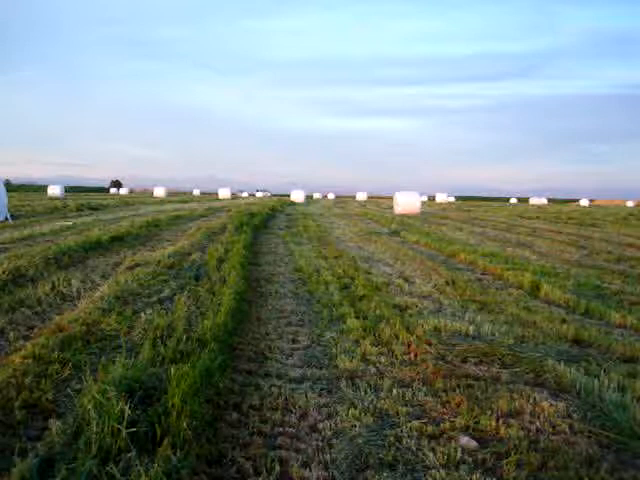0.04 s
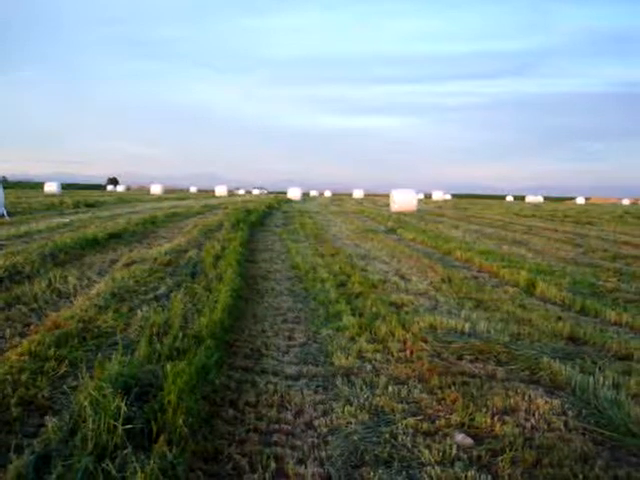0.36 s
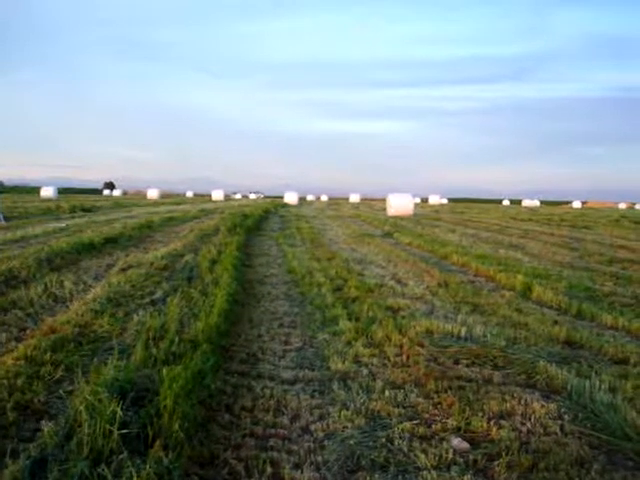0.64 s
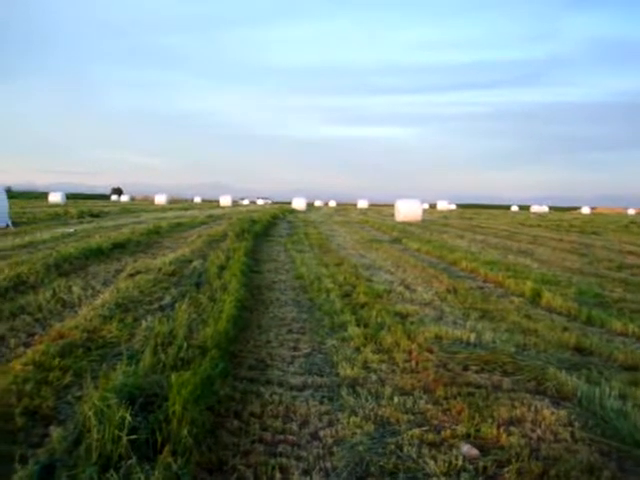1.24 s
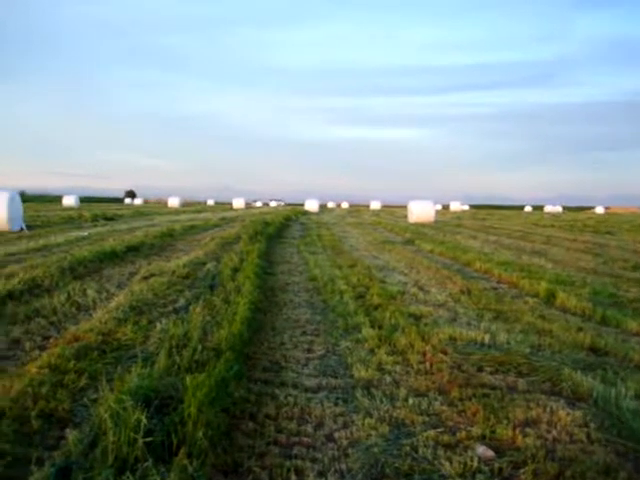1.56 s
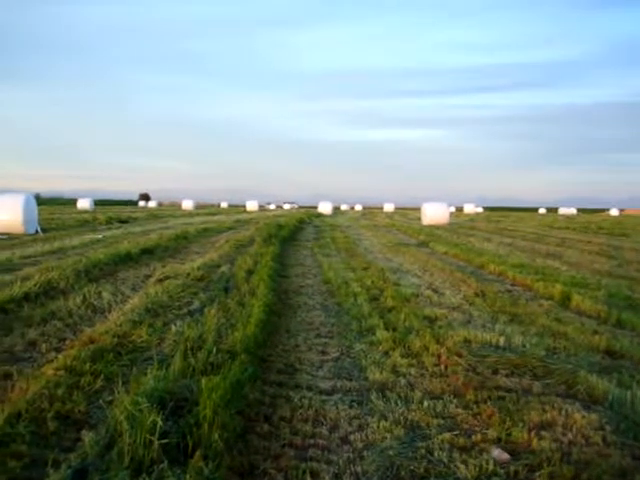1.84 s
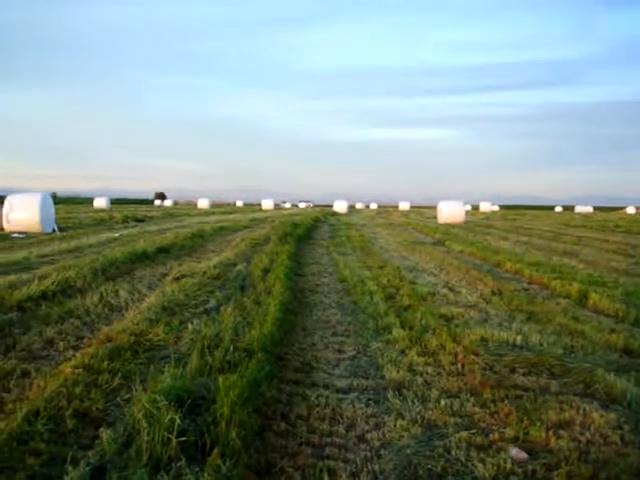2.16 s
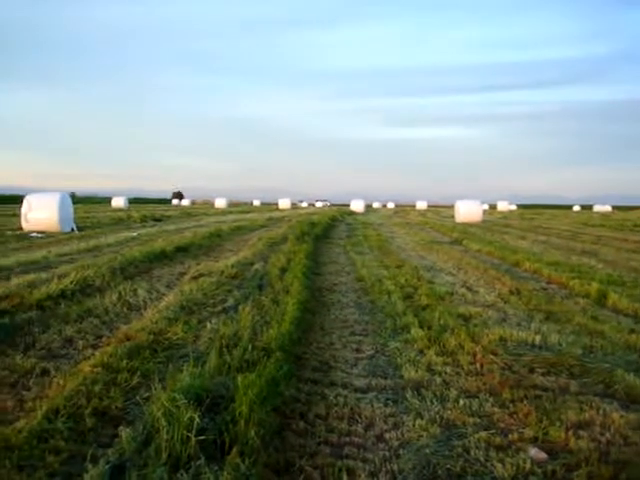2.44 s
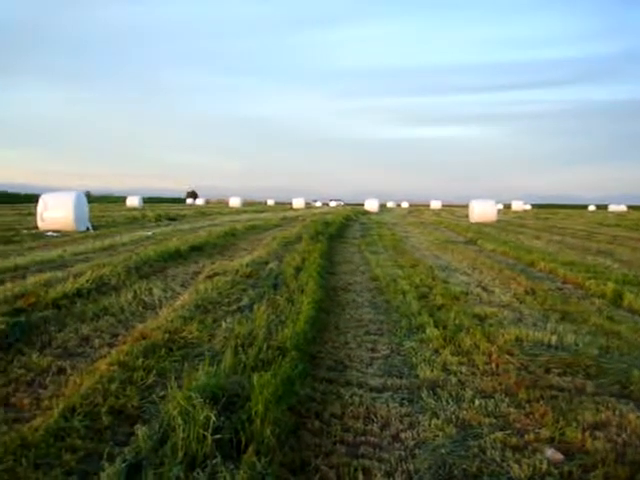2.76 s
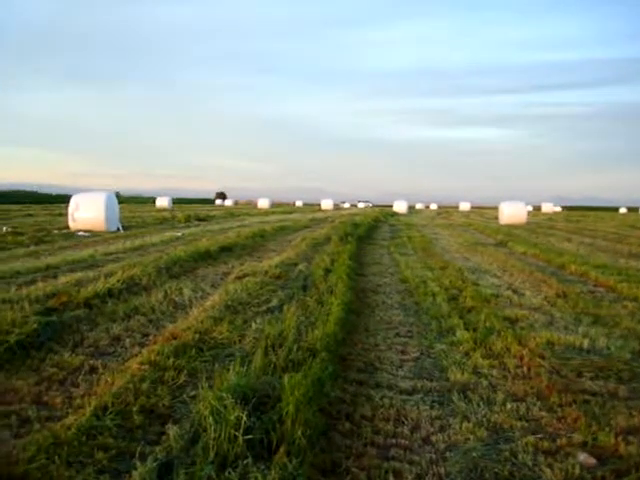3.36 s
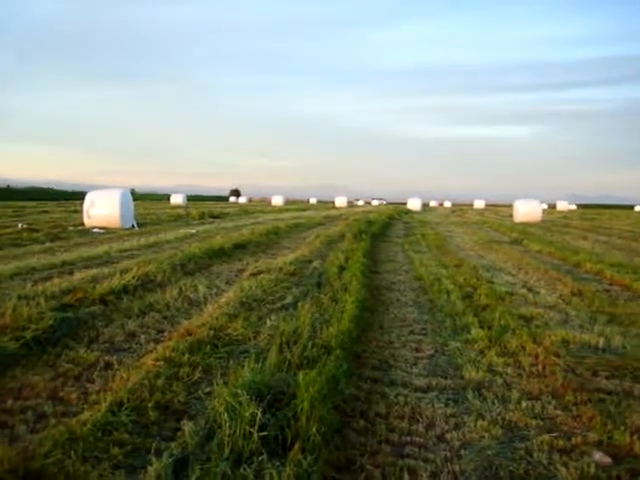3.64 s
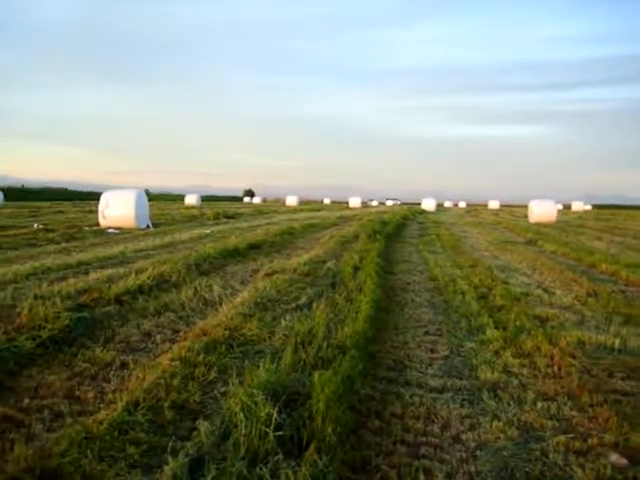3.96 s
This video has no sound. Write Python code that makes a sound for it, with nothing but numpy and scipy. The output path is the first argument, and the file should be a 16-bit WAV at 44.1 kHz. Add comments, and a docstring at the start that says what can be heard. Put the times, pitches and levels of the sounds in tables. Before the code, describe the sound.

Songbirds sing across an open field, one whistling slurred notes from 0.8 seconds to the end. From 1.2 to 2.3 seconds another adds high chips and buzzes ending in a trill, while distant birds pipe faintly. Close by, a small camera motor ticks and whirrs for the first two seconds, with handling bumps and clicks; more clicks come around 3.5 seconds. Soft wind hiss and faint hum lie underneath.

```python
"""An open hay field: soft wind hiss, a low hum and a thin electronic whine lie under everything.
For the first two seconds a small camera motor ticks, whines and whirrs close by; the housing clicks
and bumps in the hand. From 0.8 s a songbird whistles slurred notes. From 1.2 to 2.3 s another sings
a high phrase of chips and buzzes ending in a trill, and far birds begin to pipe. A faint drone swells,
the housing clicks again around 3.5 s, and a far bird hoots at the end."""
import sys
import numpy as np
from scipy import signal
from scipy.fft import rfft, irfft, next_fast_len
from scipy.io import wavfile
from scipy.ndimage import uniform_filter1d, map_coordinates

SR = 44100
rng = np.random.default_rng(int(sys.argv[2]) if len(sys.argv) > 2 else 0)


def output_pcm(signal):
    """Save a mono or channel-first signal as 16-bit PCM at the path in sys.argv[1].

    Samples are clipped to [-1, 1] before scaling.
    """
    pcm = np.clip(np.atleast_2d(signal).T, -1, 1) * 32767
    wavfile.write(sys.argv[1], SR, np.round(pcm).astype(np.int16))


N = 176400


def amp(db):
    """Decibels to gain."""
    return 10 ** (np.asarray(db) / 20)


def clock(length_s):
    """Sample times of a short sound."""
    return np.arange(max(int(length_s * SR), 8)) / SR


def decay(t, t60_s):
    """Exponential fall, 60 dB in t60_s."""
    return np.exp(-np.log(1000) * t / t60_s)


def curve(rows):
    """(time [s], value) rows as one value per sample."""
    return np.interp(np.arange(N) / SR, *np.transpose(rows))


def wobble(rate_hz, size=N):
    """Smooth random curve, rate_hz knots a second."""
    return map_coordinates(rng.standard_normal(2048), [np.arange(size) * rate_hz / SR], mode="wrap")


def noise(colour):
    """Noise of rms 1, shaped by (frequency [Hz], gain [dB]) rows."""
    hz, db = np.transpose(colour)
    gain = amp(np.interp(np.log(np.fft.rfftfreq(N, 1 / SR) + 1), np.log(hz + 1), db))
    shaped = irfft(rfft(rng.standard_normal(N)) * gain, N)
    return shaped / np.sqrt(np.mean(shaped ** 2) + 1e-20)


def add(out, start_s, sound):
    """Mix a sound in at start_s."""
    i = min(max(round(start_s * SR), 0), N)
    out[i:i + len(sound)] += sound[:N - i]


def tone(hz, rms_db, edge_s=0.0013):
    """Sine on a pitch track, with soft ends."""
    t = np.arange(len(hz)) / SR
    fade = np.sin(np.pi / 2 * np.clip(np.minimum(t, t[-1] - t) / edge_s, 0, 1))
    return np.sqrt(2) * amp(rms_db) * fade * np.sin(2 * np.pi * np.cumsum(hz) / SR)


def bursts(events, colour, rise_s, t60_s):
    """One dying puff of coloured noise per (time [s], level [dB]) event."""
    t, envelope = clock(.2), np.zeros(N)
    shape = (1 - np.exp(-t / rise_s)) * decay(t, t60_s)
    for start_s, db in events:
        add(envelope, start_s, amp(db) * shape / shape.max())
    return envelope * noise(colour)


def ring(modes, db, rise_s=0.00041):
    """Damped modes struck once, with random phase and slight level scatter."""
    t, sound = clock(.1), 0
    for hz, gain_db, t60_s in modes:
        envelope = amp(db + gain_db + rng.normal(0, 1)) * decay(t, t60_s)
        sound += envelope * np.sin(2 * np.pi * (hz * t + rng.random()))
    return sound * (1 - np.exp(-t / rise_s))


# wind and microphone floor spectrum (frequency [Hz], gain [dB])
WIND_COLOUR = [(15, -27), (25, -13), (45, -4.5), (80, 0), (200, -4.5), (380, -5), (630, -3), (815, -9),
               (1000, -7), (1450, -13), (2200, -13.5), (3500, -16.5), (5000, -17.5), (6500, -18),
               (7300, -17), (8300, -17), (10000, -27.5)]
def wind(level_db=-53):
    """Soft, slightly fluttering hiss of wind and microphone floor."""
    return amp(level_db + wobble(12)) * noise(WIND_COLOUR)


# hum lines (frequency [Hz], level [dB], unsteadiness [dB])
HUM_LINES = [(60.4, -61, 0.4), (90.8, -66, 0.5), (120.2, -66.5, 0.5)]
# whine lines (frequency [Hz])
WHINE_HZ = [7854, 7882, 8122]
# whine lines (level [dB])
WHINE_DB = [-72.5, -70, -68.5]
def electronics():
    """The camera's low hum and thin whine: slightly unsteady sines."""
    hum = sum(tone(hz + 0.65 * wobble(7.95), db + shake_db * wobble(14))
              for hz, db, shake_db in HUM_LINES)
    whine = sum(tone(hz + 2 * wobble(8), db + wobble(9.2)) for hz, db in zip(WHINE_HZ, WHINE_DB))
    return hum + whine


# drone envelope (time [s], level [dB])
DRONE_ENVELOPE = [(0, -74), (2.0, -77), (2.3, -59), (2.6, -63), (2.85, -73), (3.3, -67), (4, -66)]
def drone(hz=623.7):
    """One faint, wavering tone far away."""
    return tone(hz + 5 * wobble(20), curve(DRONE_ENVELOPE) + 2 * wobble(12))


# piped notes (start [s], length [s], pitch [Hz], end pitch [Hz], level [dB])
PIPE_NOTES = [(1.273, 0.13, 1487, 1430, -63.5), (1.473, 0.038, 3270, 2980, -58),
              (2.4, 0.051, 5060, 4900, -55.5), (2.502, 0.05, 5080, 5020, -57),
              (2.577, 0.092, 5270, 5300, -64), (2.725, .03, 5100, 5000, -63.5),
              (3.043, 0.031, 5050, 4950, -61), (3.756, .04, 3610, 3600, -64)]
# low hoots (start [s], length [s], pitch [Hz], level [dB])
HOOT_NOTES = [(3.94, .08, 550, -53), (3.93, .09, 590, -67)]
def far_birds(edge_s=0.01):
    """Faint fluttering notes of nearly level pitch."""
    out = np.zeros(N)
    for start_s, length_s, hz, end_hz, db in PIPE_NOTES:
        size = len(clock(length_s))
        pitch_hz = np.linspace(hz, end_hz, size) * (1 + 0.013 * wobble(400, size))
        add(out, start_s, tone(pitch_hz, db + 3 * wobble(150, size), edge_s))
    for start_s, length_s, hz, db in HOOT_NOTES:
        pitch_hz = hz * (1 + 0.031 * wobble(101, len(clock(length_s))))
        add(out, start_s, tone(pitch_hz, db, edge_s))
    return out


# hand bumps (time [s], level [dB])
BUMP_HITS = [(0.1228, -37.5), (0.136, -51), (.162, -42), (1.197, -45), (1.208, -37.5), (3.529, -48)]
# camera body modes (frequency [Hz], gain [dB], t60 [s])
BODY_MODES = [(264, -4.5, 0.082), (347, 0, 0.068), (451, -2, 0.028)]
# scuff spectrum (frequency [Hz], gain [dB])
SCUFF_COLOUR = [(60, -25), (200, -13), (310, -4.5), (430, 4), (700, -9.5), (1200, -11), (3000, -19),
                (9000, -33.5)]
def hand_bumps(scuff_db=-4.5):
    """The hand thuds on the camera body: dull modes and a scuff."""
    out = np.zeros(N)
    for start_s, db in BUMP_HITS:
        add(out, start_s, ring(BODY_MODES, db))
    return out + amp(scuff_db) * bursts(BUMP_HITS, SCUFF_COLOUR, rise_s=.0006, t60_s=0.04)


# clicks (time [s], noise level [dB], ring level [dB], favoured frequency [Hz])
CLICK_HITS = [(0.2568, -30, -32.5, 3050), (0.4922, -48.5, -44, 2200), (0.5103, -43, -46.5, 2200),
              (1.345, -44.5, -49, 3000), (2.061, -34.5, -38.5, 1620), (3.4455, -36.5, -40.5, 2280),
              (3.462, -51, -52, 4370), (3.477, -60, -50, 3000), (3.497, -34.5, -39, 2280),
              (3.5123, -40, -39.5, 2280), (3.528, -44.5, -48, 4400), (3.544, -47, -52, 4400),
              (3.562, -34.5, -41, 1250)]
# contact noise spectrum (frequency [Hz], gain [dB])
CONTACT_COLOUR = [(200, -9), (700, -1.5), (1300, 2.5), (3000, -1), (4800, -2), (6500, -1), (8500, -5),
                  (10000, -24.5)]
# housing modes (frequency [Hz], gain [dB], t60 [s])
HOUSING_MODES = [(1250, -12, .016), (1637, -5.5, 0.026), (2147, -0.5, 0.026), (2370, -1.5, 0.019),
                 (3010, -0.5, .012), (3970, -2.5, 0.026), (4480, 1.5, 0.015)]
def housing_clicks(boost_db=6.5, width_octaves=0.14):
    """Sharp clicks ring the plastic housing; each contact point favours modes near one frequency."""
    out = bursts([row[:2] for row in CLICK_HITS], CONTACT_COLOUR, rise_s=0.00052, t60_s=0.017)
    hz, gain_db, t60_s = np.transpose(HOUSING_MODES)
    for start_s, _, ring_db, favoured_hz in CLICK_HITS:
        nearness = np.exp(-(np.log2(hz / favoured_hz) / width_octaves) ** 2)
        add(out, start_s, ring(zip(hz, gain_db + boost_db * nearness, t60_s), ring_db))
    return out


# whirr envelope (time [s], level [dB])
WHIRR_ENVELOPE = [(.08, -50), (.3, -54.5), (.5, -55), (.72, -50.5), (.82, -57.5), (1.1, -51.5), (1.3, -57),
                  (1.45, -59), (1.65, -50.5), (1.8, -64.5), (2.0, -54.5), (2.12, -69.5), (2.3, -92.5)]
# whirr spectrum (frequency [Hz], gain [dB])
WHIRR_SPECTRUM = [(100, -5), (350, 6), (1000, 2.5), (1450, 0.5), (2150, 3), (2800, -2.5), (3600, -3),
                  (4500, -5.5), (6000, -13.5), (7800, -8.5), (9000, -15), (10000, -17)]
# hiss envelope (time [s], level [dB])
HISS_ENVELOPE = [(.08, -85), (.46, -52.5), (.52, -49.5), (.59, -51), (.66, -47), (.72, -46), (.76, -57),
                 (.95, -79), (1.12, -52), (1.3, -67), (1.45, -59), (1.56, -51), (1.63, -46), (1.69, -46.5),
                 (1.72, -72), (2.1, -75)]
# hiss spectrum (frequency [Hz], gain [dB])
HISS_SPECTRUM = [(1000, -21.5), (3500, -23), (4800, -3.5), (5400, -8), (6400, -3), (7200, 5), (8300, -0.5),
                 (9200, -2), (10000, -10.5)]
# motor whines (start [s], length [s], pitch [Hz], level [dB])
MOTOR_WHINES = [(0.179, 0.028, 3350, -56.5), (0.219, 0.023, 2360, -54), (0.256, .02, 4320, -45.5),
                (0.38, 0.046, 3840, -62), (0.397, 0.023, 2410, -54), (0.433, .04, 2390, -54),
                (0.737, 0.039, 3370, -60), (0.78, .02, 4340, -50.5), (0.792, 0.084, 3830, -56.5),
                (0.878, 0.051, 2404, -54), (1.146, 0.046, 2390, -54), (1.21, .04, 3850, -57),
                (1.241, .02, 4300, -52.5), (1.262, 0.019, 3850, -59), (1.975, 0.036, 2380, -52)]
def motor_whirr():
    """The running motor: broad whirr, swelling treble hiss and short steady whines."""
    whirr = amp(curve(WHIRR_ENVELOPE) + 1.2 * wobble(40)) * noise(WHIRR_SPECTRUM)
    hiss = amp(curve(HISS_ENVELOPE) + 1.9 * wobble(110)) * noise(HISS_SPECTRUM)
    whines = np.zeros(N)
    for start_s, length_s, hz, db in MOTOR_WHINES:
        add(whines, start_s, tone(np.full(len(clock(length_s)), hz), db, edge_s=0.0045))
    return whirr + hiss + whines


# tick envelope (time [s], level [dB])
TICK_ENVELOPE = [(.1, -41.5), (.22, -47.5), (.29, -43.5), (.41, -45), (.51, -41.5), (.55, -47), (.72, -42),
                 (.8, -45.5), (.92, -47.5), (1.03, -43), (1.12, -43.5), (1.24, -47.5), (1.345, -38.5),
                 (1.43, -42.5), (1.63, -46), (1.79, -41), (1.86, -46)]
# tick spectrum (frequency [Hz], gain [dB])
TICK_SPECTRUM = [(300, -32), (1500, -17), (2200, -5.5), (3300, -13.5), (4400, -6), (5150, -14), (5800, 1.5),
                 (6600, -5.5), (8500, -5.5), (10000, -19)]
# lens modes (frequency [Hz], gain [dB], t60 [s])
LENS_MODES = [(2120, -11.5, 0.017), (4390, -7, 0.016), (5000, -9.5, 0.015), (5790, -1, 0.013),
              (6200, -10.5, 0.0099)]
def motor_ticks(rate_hz=59.93, first_s=.0922, stop_s=1.85, ring_gain_db=6):
    """Each motor step makes a puff of noise and rings the lens."""
    times_s = np.arange(first_s, stop_s, 1 / rate_hz)
    levels_db = np.interp(times_s, *np.transpose(TICK_ENVELOPE)) + rng.normal(0, .5, len(times_s))
    out = bursts(zip(times_s, levels_db), TICK_SPECTRUM, rise_s=0.00073, t60_s=0.0064)
    for start_s, db in zip(times_s, levels_db):
        add(out, start_s, ring(LENS_MODES, db + ring_gain_db))
    return out


# buzzes (start [s], length [s], pitch [Hz], end pitch [Hz], level [dB],
#         warble rate [Hz], warble depth [Hz], swell [dB])
BUZZ_NOTES = [(0.079, 0.039, 5530, 5545, -43, 430, 260, 1), (1.447, 0.11, 5090, 5180, -46.5, 160, 180, 2.5),
              (1.551, 0.039, 5200, 5150, -43.5, 340, 110, -2), (1.599, .016, 7340, 7760, -48, 250, 150, -2),
              (1.62, 0.049, 5700, 5700, -50.5, 90, 250, -5), (1.687, 0.0083, 5740, 5600, -40, 300, 99, 0),
              (1.699, 0.033, 5570, 5620, -36, 430, 190, -3), (1.802, 0.032, 5680, 5800, -38, 370, 260, 4.5),
              (1.859, 0.074, 5790, 5680, -43, 290, 330, 8), (1.988, 0.044, 5530, 5200, -54.5, 130, 334, 12),
              (2.102, 0.038, 5520, 5350, -49.5, 200, 330, 1),
              (2.174, 0.029, 5170, 5230, -47.5, 350, 270, 0), (2.223, 0.031, 7200, 7260, -61, 200, 300, 2)]
# second voice of the syrinx, same columns
UPPER_NOTES = [(0.082, .03, 7340, 6850, -51.5, 290, 300, -4), (1.872, 0.055, 7770, 7150, -52, 180, 260, -2)]
def song_buzzes(warble_jitter=.09, warble_dip=0.55, rasp_db=2):
    """The high singer's rasping notes: a fast warble swings pitch and level together."""
    out = np.zeros(N)
    for start_s, length_s, hz, end_hz, db, rate_hz, depth_hz, swell_db in BUZZ_NOTES + UPPER_NOTES:
        size = len(clock(length_s))
        progress = np.linspace(0, 1, size)
        warble_phase = 2 * np.pi * np.cumsum(rate_hz * (1 + warble_jitter * wobble(200, size))) / SR
        glide_hz = hz + (end_hz - hz) * progress
        pitch_hz = glide_hz + depth_hz * np.sin(warble_phase) + 55 * wobble(898, size)
        level_db = db + swell_db * (progress - .5) + rasp_db * wobble(357, size)
        tremolo = 1 - warble_dip * np.cos(warble_phase)
        add(out, start_s, tone(pitch_hz, level_db, edge_s=0.0029) * tremolo)
    return out


# chips (start [s], length [s], pitch [Hz], end pitch [Hz], level [dB])
CHIP_NOTES = [(1.184, 0.015, 5730, 4700, -50), (1.298, 0.01, 5640, 4720, -44.5),
              (1.358, 0.0043, 7130, 7800, -47), (1.376, .008, 7450, 7270, -40.5),
              (1.389, 0.011, 6350, 5740, -48), (1.39, .009, 7430, 7300, -45),
              (1.404, 0.0046, 6340, 5800, -47), (1.409, 0.01, 7000, 8000, -44),
              (1.729, 0.017, 7900, 7400, -49), (1.753, 0.0057, 5900, 5460, -45.5),
              (1.759, .008, 7800, 7900, -44), (1.77, 0.0059, 7700, 7700, -50),
              (1.782, 0.0038, 5800, 5630, -40.5), (1.794, 0.0063, 5750, 5560, -39),
              (1.831, 0.011, 7820, 7770, -46.5), (1.976, 0.013, 7850, 7600, -50.5),
              (1.975, 0.011, 6200, 5400, -46), (2.059, .013, 7100, 7600, -47.5),
              (2.074, 0.017, 7860, 7350, -49.5), (2.32, 0.0063, 7700, 7550, -55)]
def song_chips(scatter_hz=100):
    """The high singer's chips: very short, rough glides."""
    out = np.zeros(N)
    for start_s, length_s, hz, end_hz, db in CHIP_NOTES:
        size = len(clock(length_s))
        add(out, start_s, tone(np.linspace(hz, end_hz, size) + scatter_hz * wobble(700, size), db))
    return out


# hooked notes, the last eight forming a trill (start [s], level [dB])
HOOK_NOTES = [(2.04, -45.5), (2.144, -48), (2.157, -44.5), (2.197, -47.5), (2.229, -50), (2.239, -48),
              (2.252, -49), (2.2625, -47), (2.2727, -49), (2.2842, -45), (2.2955, -48), (2.3074, -48)]
def song_hooks(length_s=0.0093, top_hz=7440, fall_hz=2660, scatter_hz=100):
    """The high singer's hooks: the pitch hangs high, then plunges."""
    out = np.zeros(N)
    plunge_hz = top_hz - fall_hz * (clock(length_s) / length_s) ** 2.6
    for start_s, db in HOOK_NOTES:
        add(out, start_s, tone(plunge_hz + scatter_hz * wobble(690, len(plunge_hz)), db))
    return out


# whistle contours, one list per note (time [s], pitch [Hz], level [dB])
WHISTLE_NOTES = [
    [(0.845, 4470, -64), (0.853, 4630, -44.5), (0.863, 4941, -44), (0.875, 4969, -46), (0.883, 4766, -37.5),
     (0.905, 3986, -53), (0.915, 3880, -49), (0.951, 3910, -48.5), (0.965, 3660, -57)],
    [(1.04, 4400, -66), (1.046, 4618, -47), (1.056, 4854, -41.5), (1.068, 4820, -43), (1.092, 4460, -44),
     (1.1, 4283, -52), (1.104, 4335, -69), (1.11, 4443, -60)],
    [(1.175, 3840, -59), (1.191, 4467, -49), (1.201, 4790, -41.5), (1.211, 4860, -46), (1.221, 4593, -42),
     (1.23, 4377, -62)],
    [(2.335, 4450, -52), (2.359, 4760, -42), (2.371, 4554, -58), (2.393, 3759, -48.5), (2.409, 3295, -59),
     (2.435, 3300, -64), (2.471, 3620, -52), (2.491, 3585, -50), (2.5, 3408, -67)],
    [(2.615, 4600, -57), (2.621, 4523, -51), (2.639, 4690, -42.5), (2.661, 5040, -49.5), (2.685, 4740, -43),
     (2.705, 4190, -52), (2.725, 3740, -49), (2.755, 3740, -48), (2.77, 2900, -59)],
    [(2.872, 4520, -59), (2.88, 4530, -44.5), (2.902, 4750, -41), (2.95, 3350, -56), (2.992, 3638, -44.5),
     (3.028, 3750, -50.5), (3.054, 4285, -51), (3.078, 4580, -42), (3.1, 4165, -55)],
    [(3.672, 4529, -58), (3.678, 4700, -40), (3.686, 4760, -43), (3.698, 4500, -40), (3.708, 4250, -49),
     (3.718, 3980, -46), (3.724, 3440, -46), (3.73, 3570, -53)],
    [(3.846, 4270, -61), (3.854, 4460, -45), (3.868, 4310, -47), (3.894, 3520, -43.5), (3.903, 3450, -52)],
    [(3.952, 4820, -54), (3.964, 5000, -47), (3.974, 4960, -41), (3.984, 4620, -40), (4.0, 4000, -51)],
]
def whistler(waver=.004):
    """A songbird slurs pure notes up and down."""
    out = np.zeros(N)
    for note in WHISTLE_NOTES:
        times_s, hz, db = np.transpose(note)
        t = times_s[0] + clock(times_s[-1] - times_s[0])
        slur_hz = uniform_filter1d(np.interp(t, times_s, hz), size=300)
        pitch_hz = slur_hz * (1 + waver * wobble(250, len(t)))
        level_db = np.interp(t, times_s, db) + wobble(113, len(t))
        add(out, times_s[0], tone(pitch_hz, level_db, edge_s=0.0038))
    return out


def field(direct, stubble_t60_s=0.015, stubble_db=-9.5, echo_t60_s=.25, echo_db=-21):
    """Direct sound plus a quick scatter off the stubble and a weak longer echo."""
    t, out = clock(.6), direct
    for t60_s, db in [(stubble_t60_s, stubble_db), (echo_t60_s, echo_db)]:
        tail = rng.standard_normal(len(t)) * decay(t, t60_s)
        out = out + amp(db) * signal.fftconvolve(direct, tail / np.linalg.norm(tail))[:N]
    return out


def scene():
    """Birds across the field, camera noises close by, over the background; mono."""
    birds = field(whistler() + song_buzzes() + song_chips() + song_hooks() + far_birds())
    camera = motor_ticks() + motor_whirr() + housing_clicks() + hand_bumps()
    background = wind() + electronics() + drone()
    return (birds + camera + background)[None]


def record(dry):
    """The camera starts a moment late and keeps nothing above its band limit."""
    start_s, top_hz = .078, 10080
    running = dry * (np.arange(N) / SR > start_s)
    size = next_fast_len(N + SR // 2)
    passband = np.fft.rfftfreq(size, 1 / SR) < top_hz
    return irfft(rfft(running, size) * passband, size)[..., :N]


dry = scene()
out = record(dry)
output_pcm(out)
```